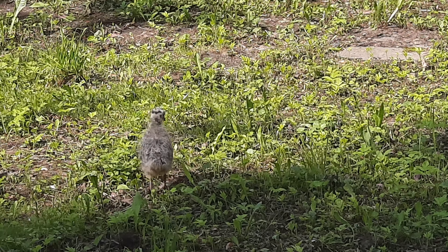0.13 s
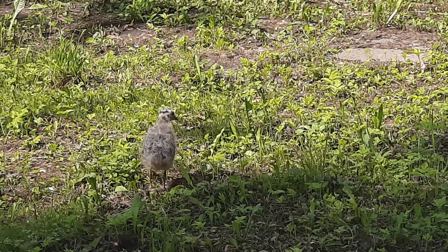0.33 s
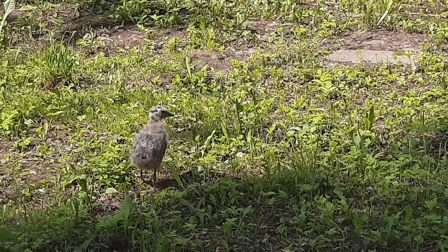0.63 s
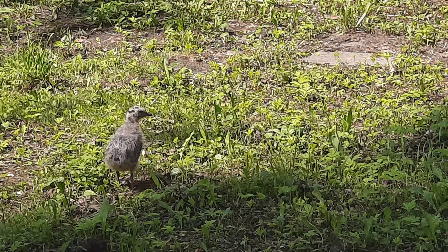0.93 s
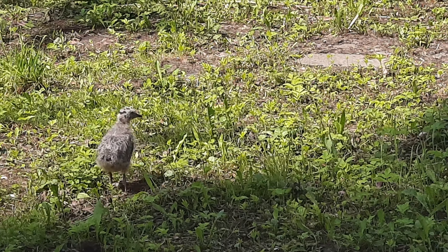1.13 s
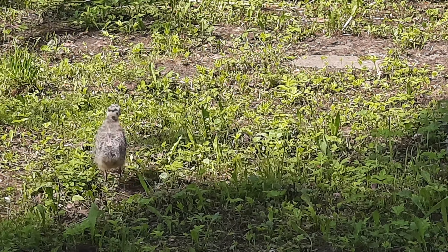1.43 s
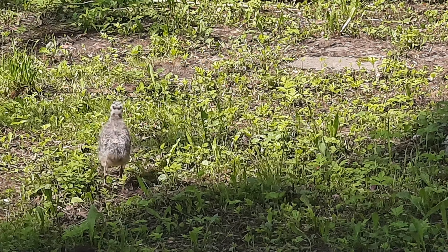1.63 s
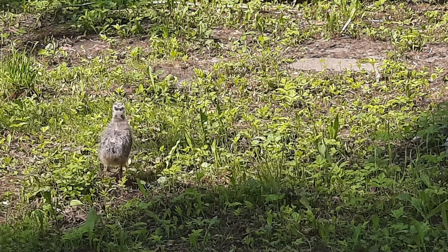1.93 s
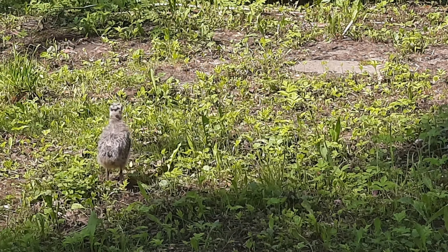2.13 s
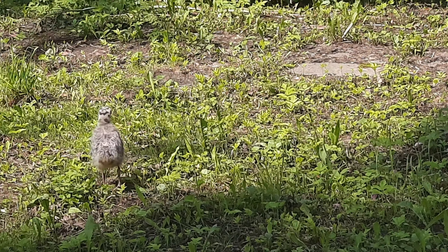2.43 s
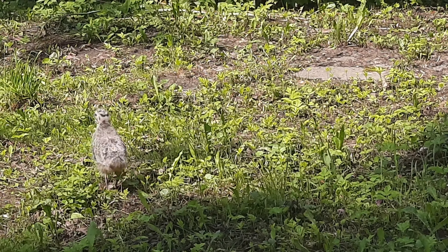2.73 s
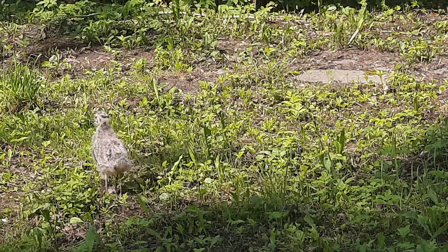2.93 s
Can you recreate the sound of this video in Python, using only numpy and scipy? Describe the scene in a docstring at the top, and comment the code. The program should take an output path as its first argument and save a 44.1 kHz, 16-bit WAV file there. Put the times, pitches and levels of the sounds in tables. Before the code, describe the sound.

Gull squawks four times with a wall echo, over gull chuckles and swelling road traffic

```python
"""A lawn beside a building, two spaced microphones: one flying gull gives four clear arched squawks.
Each is a stack of gliding overtones, thrown back by the ground and by a wall the bird is nearing.
Two other gulls chuckle further off to the left, in short notes shaped by throat resonances.
A small bird peeps far off as gliding sines, and grass ticks as tiny decaying sines.
Road traffic, shaped noise, swells behind; walls and trees add a sparse scattered tail to the gulls."""
import sys
import numpy as np
from scipy import signal
from scipy.fft import rfft, irfft
from scipy.io import wavfile
from scipy.ndimage import uniform_filter1d

SR = 44100
rng = np.random.default_rng(int(sys.argv[2]) if len(sys.argv) > 2 else 0)


def magnitude_from_level(level_db):
    """Linear magnitude for a level in decibels (20 dB per decade)."""
    exponent = np.asarray(level_db, float) / 20
    return 10 ** exponent


def unload_wav(signal):
    """Save mono or channel-first audio to the path in sys.argv[1] as 16-bit WAV at rate SR, clipped to [-1, 1]."""
    wavfile.write(
        sys.argv[1],
        SR,
        np.round(np.clip(np.atleast_2d(signal).T, -1, 1) * 32767).astype(np.int16),
    )


N = 136269
T = np.arange(N) / SR

# The flying gull's four pitch arches. Each row: time in seconds, pitch in Hz, relative level in dB.
SQUAWK_CURVES = [
    [(.486, 1003, -52), (.496, 1105, -36), (.513, 1186, -34.5), (.535, 1239, -33), (.551, 1267, -37),
     (.575, 1239, -38), (.595, 1089, -37.5), (.617, 958, -42), (.642, 780, -51)],
    [(1.287, 1044, -38), (1.3, 1247, -28), (1.312, 1280, -28.5), (1.345, 1328, -29), (1.376, 1265, -28),
     (1.42, 1181, -30), (1.444, 1136, -29.5), (1.456, 1027, -36), (1.47, 843, -38)],
    [(1.979, 1026, -62), (1.986, 1095, -35.5), (2.0, 1241, -27), (2.016, 1277, -31.5), (2.035, 1296, -26.5),
     (2.062, 1248, -32.5), (2.096, 1154, -32.5), (2.122, 1030, -36.5), (2.15, 820, -37.5)],
    [(2.518, 865, -51), (2.53, 1187, -29.5), (2.546, 1285, -30.5), (2.578, 1314, -26), (2.604, 1281, -25),
     (2.642, 1184, -25), (2.664, 1127, -29), (2.678, 934, -45), (2.69, 790, -37)],
]
# Overtones 1-12 of each squawk as the bird turns. Each pair of rows: left microphone, then right, in dB.
SQUAWK_OVERTONES = [
    [(-14, -2, -10, -15, -22, -31, -35, -38, -35, -36, -37, -37),
     (-22, 0, -8, -11, -12, -19, -21, -28, -28, -31, -37, -41)],
    [(-18, 0, -6, -17, -16, -23, -38, -32, -33, -29, -26, -32),
     (-23, -2, -14, -17, -7, -16, -17, -27, -30, -31, -37, -46)],
    [(-17, 0, -3, -16, -18, -22, -40, -46, -38, -33, -28, -33),
     (-22, -5, -8, -16, -13, -22, -29, -47, -38, -35, -37, -43)],
    [(-19, 0, -6, -18, -19, -21, -37, -43, -41, -42, -38, -43),
     (-23, -1, -16, -19, -15, -28, -31, -42, -42, -42, -46, -50)],
]
# How much later each squawk reaches the right microphone. Each entry: lag in ms.
RIGHT_LAGS = [.13, .195, .185, .115]
# The longer way off the ground. Each entry: extra travel time of one squawk in ms.
GROUND_PATHS = [1.583, 1.3, 1.111, 1.557]
# Wall echo of each squawk. Each row: level at the left microphone in dB, level at the right in dB.
WALL_LEVELS = [(-10, -13.5), (-8, -14), (-4.5, -8.5), (-5, -8)]
# The longer way off the wall. Each row: time in seconds, extra travel time in ms.
WALL_PATHS = [(.55, 74), (1.4, 79), (2.05, 70), (2.3, 63), (2.75, 55)]
# What the wall does to the tone. Each row: frequency in Hz, gain in dB.
WALL_TONE = [(2500, -1), (3900, -9), (5200, -3.5), (6700, 5.5), (12000, 3.5)]
# Nearer chuckling gull. Each row: start in seconds, length in seconds, relative level in dB, top pitch in Hz,
# length of the squeaky start in seconds.
NEAR_CHUCKLE = [(1.143, 0.029, -47.5, 556.5, 0.0083), (1.225, 0.038, -47, 580, 0.022),
                (1.509, 0.038, -44, 555, 0.019), (1.575, 0.035, -46.5, 566, 0.02),
                (1.626, 0.031, -51.5, 543, 0.017), (2.403, 0.037, -44.5, 562, 0.0123),
                (2.496, 0.025, -40.5, 585, 0.02), (2.814, 0.036, -46.5, 562, 0.017)]
# Overtones of the squeaky start. Each row: multiple of the pitch, level in dB.
SQUEAK_OVERTONES = [(4, -2), (8, -9.5), (12, -8), (16, -16), (20, -22)]
# Throat of the nearer chuckler. Each row: frequency in Hz, gain in dB.
NEAR_THROAT = [(500, -15), (2200, -17), (2800, 1.5), (3400, -9.5), (4500, -9.5), (6700, -11.5),
               (9000, -19.5), (15000, -39)]
# Far chuckling gull. Each row: start in seconds, length in seconds, relative level in dB, top pitch in Hz.
FAR_CHUCKLE = [(2.724, 0.027, -44, 626), (2.781, 0.034, -45, 606), (2.845, 0.024, -45, 637),
               (2.901, 0.028, -45, 628), (2.957, .03, -47, 611), (3.027, 0.024, -49, 595),
               (3.07, 0.024, -53.5, 558)]
# Throat of the far chuckler. Each row: frequency in Hz, gain in dB.
DISTANT_THROAT = [(600, -7.5), (1800, -17), (2450, -3), (3050, -3.5), (3700, -10), (4400, -18.5),
                  (7000, -37.5)]
# Scatter off walls and trees. Each row: frequency in Hz, time to fall by 60 dB in seconds.
YARD_DECAY = [(1000, 2.9), (2500, 1.05), (5300, 0.93), (12000, 1.08)]
# Small bird far off. Each row: time in seconds, pitch in Hz, relative level in dB.
PEEP_CURVE = [(0.89, 4710, -69), (0.938, 4840, -66), (0.99, 4320, -67)]
# Grass ticks. Each row: start in seconds, starting level in dB.
GRASS_TICKS = [(2.9112, -47), (2.9195, -45), (2.937, -46), (2.9534, -48), (3.0402, -45)]
# Tone of the road. Each row: frequency in Hz, relative level per Hz in dB.
ROAD_TONE = [(25, -26), (64, 14), (102, -7), (166, -6), (242, -11.5), (317, -5.5), (384, -13.5), (591, -15),
             (840, -9), (1400, -17), (1890, -20), (3520, -33), (4740, -34), (16000, -65.5)]
# Traffic coming nearer. Each row: time in seconds, relative roar level in dB, rumble lift over the roar in dB,
# hiss lift over the roar in dB.
TRAFFIC_SWELL = [(.08, -41.5, -1.5, 0.5), (.75, -40, -2, -2.5), (1.15, -35.5, -3, 0.5),
                 (1.6, -32.5, -1, 0.5), (2.05, -33, -1.5, -0.5), (2.6, -33.5, -1.5, 6), (3.08, -33.5, 2, 1)]
# How alike the road is at both microphones. Each row: frequency in Hz, likeness from 0 to 1.
ROAD_LIKENESS = [(60, 0.95), (300, 0.97), (700, 0.71), (1400, 0.44), (3000, 0.23), (8000, 0.043),
                 (15000, 0.099)]
# Which side the road leans to. Each row: frequency in Hz, left over right in dB.
ROAD_LEAN = [(60, -1.5), (110, 3), (250, -0.5), (700, 3), (1290, 3), (2380, 4), (4400, 1.5), (8120, -3.5),
             (15000, -2)]

# squawk voice: RASP in radians per overtone number, wanders in dB rms for overtone 1
RASP, WANDER_DB, WALL_WANDER_DB = .05, 1.4, 2.2
FADE_DB = 18  # overtones fade per octave above the second, per octave the pitch sinks
THROAT_HZ, THROAT_WIDTH_HZ, THROAT_DB = 5800, 350, 7  # lifts whichever overtone glides through it
BREATH_DB = -29  # air noise against the level curve
GROUND_DB, GROUND_HZ, WALL_LAG_MS = -6, 4000, 0.281
# chuckle notes: rasps in radians per overtone number before the squeak scaling
NOTE_RASP, FAR_RASP = .075, .15
NOTE_RISE_S, NOTE_ARCH, NOTE_FADE_DB, NOTE_HISS_DB = 0.0036, 0.019, -6, -32
NOTE_PAN_DB, FAR_PAN_DB, NOTE_LAG_MS = 17, 23.5, 0.286  # left over right; right is later
NOTE_ECHO_MS, NOTE_ECHO_DB = 34, -9.5
# scatter: sends in dB; extra treble from nearby leaves, full above THROAT_HZ, and its time constant
YARD_DB, NOTE_YARD_DB, FAR_YARD_DB, NEAR_DB, NEAR_S = -5, 4, 4.5, 6.5, 0.16
START_S, LOW_CUT_HZ = .069, 43.6


def evened(x):
    """Scales a signal to rms 1."""
    return x / np.sqrt(np.mean(x ** 2) + 1e-20)


def read(points, hz):
    """Reads a table of (Hz, value) along a logarithmic frequency scale."""
    f, value = np.transpose(points)
    return np.interp(np.log(hz + 1), np.log(f + 1), value)


def slow(shape, seconds):
    """Chance smoothed along the last axis, rms 1."""
    width = max(round(seconds * SR), 2)
    once = uniform_filter1d(rng.standard_normal(shape), width)
    return evened(uniform_filter1d(once, width))


def late(x, ms):
    """Delays by travel time, to a fraction of a sample, by turning phases."""
    hz = np.fft.rfftfreq(N, 1 / SR)
    return irfft(rfft(x) * np.exp(-2j * np.pi * hz * ms / 1000), N)


def squawk(mix, wet, curve, overtones, lag_ms, ground_ms, wall):
    """A clean stack of gliding overtones reaches each microphone directly, off the ground and off the wall."""
    s, pitch, level_db = np.transpose(curve)
    ears_db = np.array(overtones)[:, :, None]
    both_db = ears_db.max(0)
    k = np.arange(1, ears_db.shape[1] + 1)[:, None]
    a, b = round(s[0] * SR), round((s[-1] + .1) * SR)  # room for the echoes
    t = T[a:b]
    hz = np.interp(t, s, pitch)
    turns = np.cumsum(uniform_filter1d(hz, 200)) / SR
    husk = RASP * k * slow((len(k), b - a), .0008)

    def heard(ms, colour_db, wander_db=WANDER_DB * np.sqrt(k)):
        """The voice after a travel time, its overtones wandering in level."""
        at = t - ms / 1000
        then_hz = np.interp(at, t, hz)
        db = np.interp(at, s, level_db, -200, -200)
        sunk = np.log2(then_hz / pitch.max()) * (at > s[3])  # octaves, from the fourth point on
        db = db + FADE_DB * np.log2(np.maximum(k / 2, 1)) * sunk
        db = db + THROAT_DB * np.exp(-((k * then_hz - THROAT_HZ) / THROAT_WIDTH_HZ) ** 2)
        size = magnitude_from_level(db + colour_db + wander_db * slow(husk.shape, 0.011) + 6.5)
        size = size * (k * hz < SR / 2.6)
        wave = np.cos(2 * np.pi * k * np.interp(at, t, turns) + husk)
        return (size * wave).sum(0)

    far_ms = np.interp(t, *np.transpose(WALL_PATHS))
    wall_tone_db = read(WALL_TONE, k * np.interp(t - far_ms / 1000, s, pitch))
    ground_db = GROUND_DB - 10 * np.log10(1 + (GROUND_HZ / (k * hz)) ** 4)  # grass returns the treble best
    for ch in range(2):
        direct = heard(ch * lag_ms, ears_db[ch])
        ground = heard(ch * lag_ms + ground_ms, ears_db[ch] + ground_db)
        echo = heard(far_ms + ch * WALL_LAG_MS, both_db + wall[ch] + wall_tone_db,
                     WALL_WANDER_DB * np.sqrt(k))
        air = np.diff(rng.standard_normal(b - a + 1))
        air = magnitude_from_level(BREATH_DB + np.interp(t, s, level_db, -200, -200)) * air
        mix[ch, a:b] += direct + ground + echo + air
    wet[a:b] += heard(0, both_db)


def chuckle_note(start, length, level_db, pitch_hz, throat, rasp, squeak_s=0.):
    """A full gruff stack under an arched pitch; a squeaky start sounds only every fourth overtone."""
    t = T[:round(length * SR)]
    hz = pitch_hz * (1 - NOTE_ARCH * (2 * t / length - 1) ** 2)
    turns = np.cumsum(hz) / SR
    k = np.arange(1, 27)[:, None]
    gruff = np.clip((t - squeak_s) / 0.00058, 0, 1) if squeak_s else 1
    squeak = sum(magnitude_from_level(db) * (k == m) for m, db in SQUEAK_OVERTONES)
    gruff_size = magnitude_from_level(read(throat, k * hz) + 4.2 * slow((len(k), len(t)), 0.0057))
    size = gruff * gruff_size + (1 - gruff) * squeak
    husk = rasp * (.2 + gruff) * k * slow(size.shape, .002)
    voice = (size * np.cos(2 * np.pi * k * turns + husk)).sum(0)
    # only notes with a squeaky start carry hiss
    voice += magnitude_from_level(NOTE_HISS_DB) * bool(squeak_s) * np.diff(rng.standard_normal(len(t) + 1))
    shape = np.minimum(np.minimum(t, length - t) / NOTE_RISE_S, 1)
    shape = shape * magnitude_from_level(NOTE_FADE_DB * (t / length) ** 2)
    out, a = np.zeros(N), round(start * SR)
    out[a:a + len(t)] = (magnitude_from_level(level_db + 4.5) * shape * voice)[:N - a]
    return out


def yard(x):
    """Sparse random returns from walls and trees, the treble mostly dying first."""
    taps = np.zeros((2, SR))
    at = np.arange(400, SR - 20, 20) + rng.integers(0, 20, (2, (SR - 401) // 20))
    np.put_along_axis(taps, at, rng.choice([-1., 1.], at.shape), 1)
    hz, t, z = signal.stft(taps, SR, nperseg=256)
    leaves_db = NEAR_DB * np.exp(-t / NEAR_S) * np.minimum(hz / THROAT_HZ, 1)[:, None]
    decay_db = -60 * t / read(YARD_DECAY, hz)[:, None]
    tail = signal.istft(z * magnitude_from_level(leaves_db + decay_db), SR, nperseg=256)[1]
    return signal.fftconvolve(x[None], tail / np.linalg.norm(tail[0]), axes=1)[:, :N]


def peep():
    """A faint thin whistle, one gliding sine, stronger at the right microphone."""
    s, hz, db = np.transpose(PEEP_CURVE)
    turns = np.cumsum(np.interp(T, s, hz)) / SR
    tone = magnitude_from_level(np.interp(T, s, db, -200, -200) + 7) * np.sin(2 * np.pi * turns)
    return tone * magnitude_from_level(np.array([[-4], [3]]))  # left, right


def ticks():
    """Tiny bright ticks in the grass: sines that fall by 60 dB in 2 ms."""
    out, t = np.zeros((2, N)), T[:60]
    for s, db in GRASS_TICKS:
        a = round(s * SR)
        hz = rng.uniform(12000, 14500, (2, 1))
        out[:, a:a + len(t)] += magnitude_from_level(db - 60 * t / .002) * np.sin(2 * np.pi * hz * t)
    return out


def traffic():
    """Noise roar, mostly from the left, with drifting patches; rumble and hiss swell in their own measure."""
    frames, hz = N // 256 + 5, np.fft.rfftfreq(1024, 1 / SR)
    a, b, c, d, patches = rng.standard_normal((frames, 513, 5)).T
    patches = evened(uniform_filter1d(uniform_filter1d(patches, 8, 0), 12, 1))
    gusts = evened(uniform_filter1d(rng.standard_normal(frames), 6))
    t, f = np.arange(frames) * 256 / SR, hz[:, None]
    s, roar_db, rumble_db, hiss_db = np.transpose(TRAFFIC_SWELL)
    db = read(ROAD_TONE, f) + np.interp(t, s, roar_db)
    db = db + np.interp(t, s, rumble_db) / (1 + (f / 180) ** 2)
    db = db + np.interp(t, s, hiss_db) / (1 + (2500 / (f + 1)) ** 2)
    db = db + 0.44 * patches + 0.54 * gusts
    same, lean = np.clip(read(ROAD_LIKENESS, f), 0, 1), magnitude_from_level(read(ROAD_LEAN, f) / 2)
    left = a + 1j * b
    right = same * left + np.sqrt(1 - same ** 2) * (c + 1j * d)
    right = right * np.exp(-2j * np.pi * f * 0.38 / 1000)  # 0.38 ms later
    band = (hz > 200) & (hz < 1500)  # the tone is scaled by its power here
    band_size = np.sqrt((magnitude_from_level(read(ROAD_TONE, hz[band])) ** 2).sum())
    z = np.array([left * lean, right / lean]) * magnitude_from_level(db) / band_size
    return magnitude_from_level(3.0) * signal.istft(z, nperseg=1024, noverlap=768)[1][:, :N]


def scene():
    """The flying gull, two chucklers to the left with one echo each, their scatter, and the background."""
    mix, wet = np.zeros((2, N)), np.zeros(N)
    for row in zip(SQUAWK_CURVES, SQUAWK_OVERTONES, RIGHT_LAGS, GROUND_PATHS, WALL_LEVELS):
        squawk(mix, wet, *row)
    near = sum(chuckle_note(*row[:4], NEAR_THROAT, NOTE_RASP, row[4]) for row in NEAR_CHUCKLE)
    far = sum(chuckle_note(*row, DISTANT_THROAT, FAR_RASP) for row in FAR_CHUCKLE)
    near = near + magnitude_from_level(NOTE_ECHO_DB) * late(near, NOTE_ECHO_MS)
    far = far + magnitude_from_level(NOTE_ECHO_DB) * late(far, NOTE_ECHO_MS)
    left = magnitude_from_level(NOTE_PAN_DB / 2) * near + magnitude_from_level(FAR_PAN_DB / 2) * far
    right = late(near / magnitude_from_level(NOTE_PAN_DB / 2) + far / magnitude_from_level(FAR_PAN_DB / 2), NOTE_LAG_MS)
    tail = yard(magnitude_from_level(YARD_DB) * wet + magnitude_from_level(NOTE_YARD_DB) * near + magnitude_from_level(FAR_YARD_DB) * far)
    return mix + np.array([left, right]) + tail + peep() + ticks() + traffic()


def band_limit(x):
    """A steep low-pass at the top of the band."""
    return signal.sosfilt(signal.butter(12, 15900, fs=SR, output="sos"), x)


def record(dry):
    """The microphones cut the deepest bass and open after a short near-silence."""
    low_cut = signal.butter(4, LOW_CUT_HZ, "high", fs=SR, output="sos")
    opening = np.clip((T - START_S) / 0.00027, .006, 1)
    return band_limit(signal.sosfilt(low_cut, dry) * opening)


dry = scene()
out = record(dry)
unload_wav(out)
```